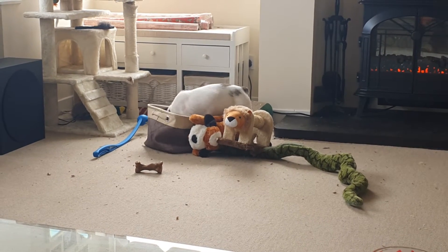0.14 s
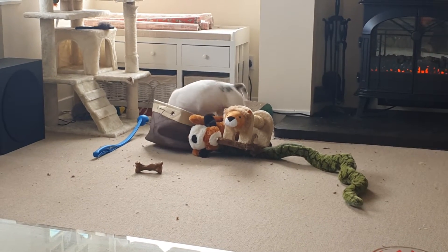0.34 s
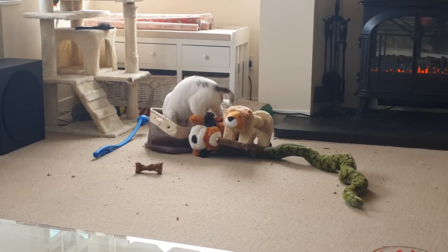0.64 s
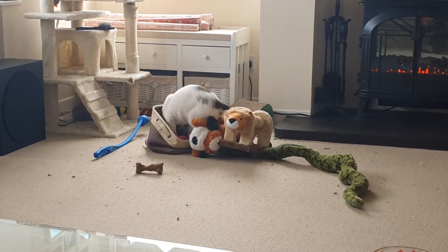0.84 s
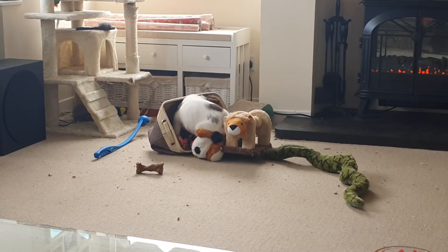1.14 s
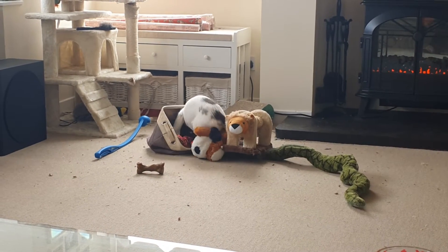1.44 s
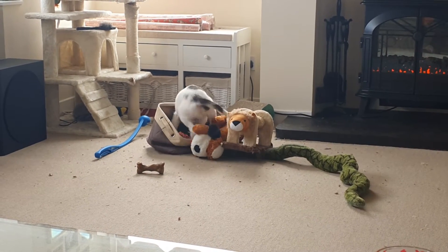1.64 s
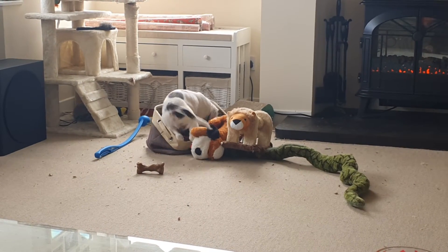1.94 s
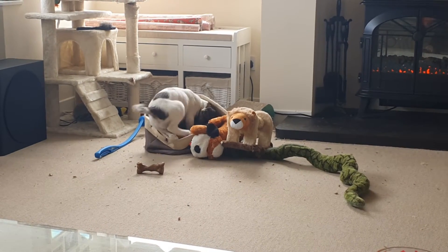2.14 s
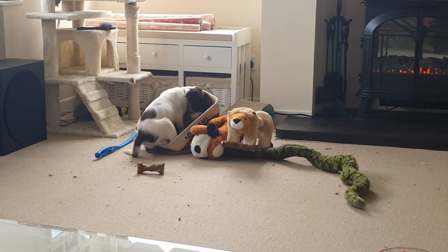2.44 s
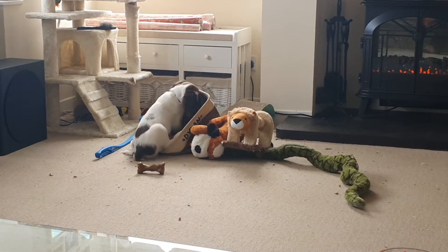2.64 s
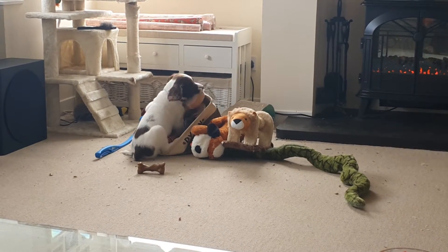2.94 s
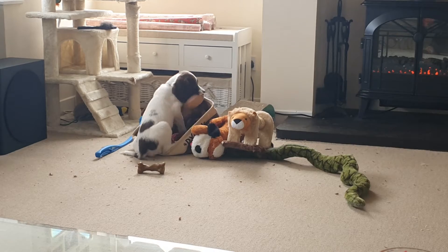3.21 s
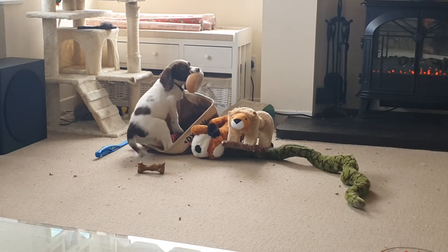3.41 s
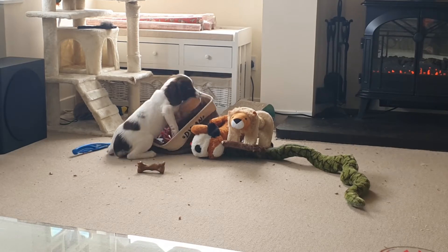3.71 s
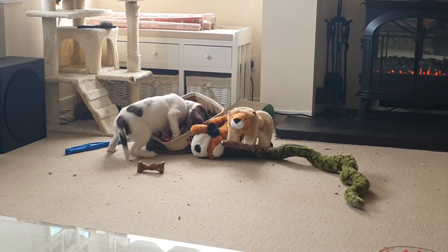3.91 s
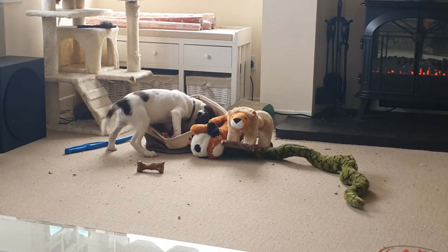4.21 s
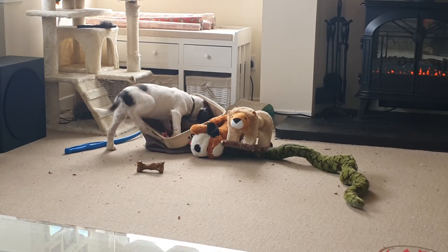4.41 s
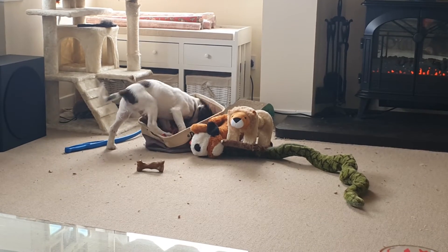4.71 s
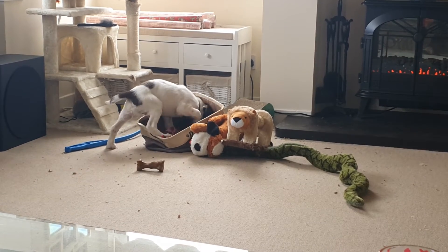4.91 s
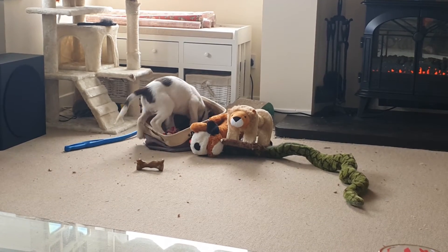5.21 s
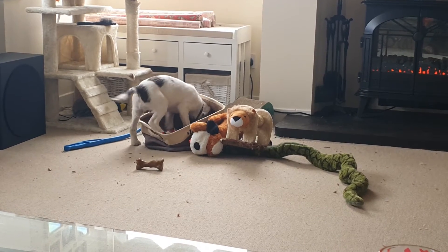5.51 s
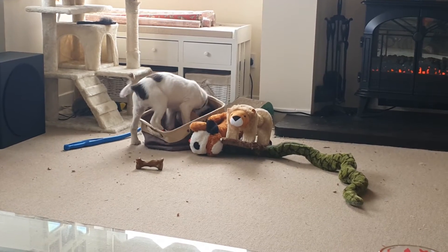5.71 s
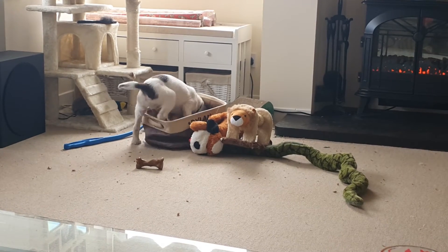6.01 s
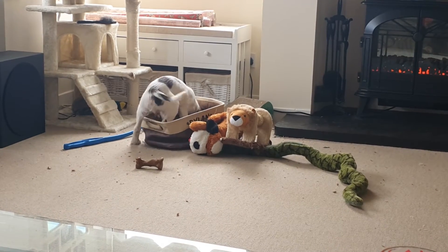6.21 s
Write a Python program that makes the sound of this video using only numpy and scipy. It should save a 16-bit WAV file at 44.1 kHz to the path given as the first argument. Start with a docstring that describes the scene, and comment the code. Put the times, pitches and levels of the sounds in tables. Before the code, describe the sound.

In a quiet carpeted living room, a puppy rummages in a fabric basket a few metres from the microphones. Cloth and fur rustle in uneven strokes while a squeaky toy gives very short, raspy chirps. Light knocks and soft thuds punctuate the digging. After a short lull near three seconds, the basket bumps hard and judders on the carpet, then gentler nosing continues over faint hum and hiss.

```python
"""A carpeted living room, where a puppy rummages in a fabric toy basket a few metres from the microphones.
It bites a squeaky toy: the reed buzzes in short bright squeaks, and air whistles thinly back in.
Shaped noise makes the rubbing of fur and cloth and the knocks of paws and toys.
The basket judders on the carpet as low, wavering tones, over a quiet room with a soft hum and hiss."""
import sys
import numpy as np
from scipy import signal
from scipy.fft import rfft, irfft, next_fast_len
from scipy.io import wavfile
from scipy.ndimage import map_coordinates

SR = 44100
rng = np.random.default_rng(int(sys.argv[2]) if len(sys.argv) > 2 else 0)


def wrap_up_sound(samples):
    """Save the sound to the file named by the first command line argument, as 16-bit audio."""
    columns = np.atleast_2d(samples).T
    # keep every value between -1 and 1, then stretch to whole-number steps
    tamed = np.clip(columns, -1, 1)
    steps = np.round(tamed * 32767).astype(np.int16)
    wavfile.write(sys.argv[1], SR, steps)


N = 280035  # length in samples

# In the colour tables of noises and of the reed, only the differences between levels matter.

# Squeezes of the toy: (t/s, length/s, pitch at start f/Hz, middle f/Hz, end f/Hz, level/dB,
# brightness/dB per octave, flutter 0-1, pressure rise over the squeeze/dB); pitch before sag and flutter
SQUEAKS = [(0.018, 0.032, 1825, 1800, 1310, -35.5, 0.5, 0.67, -3),
           (0.045, 0.049, 1613, 1340, 1200, -42, 5.5, 0.56, -11),
           (0.372, 0.03, 1875, 1737, 1313, -34.5, -4.5, 0.83, -0.5),
           (0.394, 0.038, 1540, 1320, 1194, -42, -4, 0.72, 5),
           (0.663, 0.055, 1389, 1407, 1371, -36, 1.5, 0.19, 3.5),
           (1.58, 0.037, 1370, 1912, 1970, -41.5, -1, 0.27, 3),
           (2.235, 0.031, 1268, 1370, 1446, -46, 2.5, 0.3, -4),
           (2.259, 0.022, 1635, 1577, 1405, -35.5, -3.5, 0.5, -1),
           (3.329, 0.022, 1356, 1314, 1200, -35, 7, 0.04, 4),
           (3.402, 0.015, 1503, 1483, 1320, -28, 5.5, 0.15, -2.5),
           (4.466, 0.041, 1354, 1486, 1438, -40.5, 3.5, 0.19, 14),
           (4.831, 0.032, 1480, 1692, 1423, -35, 3, 0.44, 4.5),
           (5.421, 0.043, 1315, 1409, 1340, -42.5, 4.5, 0.13, 1),
           (5.782, 0.033, 1370, 1327, 1160, -42, 7, 0.05, 0)]
# Tone colour of the toy's reed: (f/Hz, level/dB)
REED_COLOUR = [(1200, 13.5), (1650, -2.5), (2200, 8), (3000, -4.5), (3700, -3), (4400, -7.5), (5200, -10),
               (6000, -6.5), (7400, -19.5), (8900, -7.5), (10500, -14.5), (12000, -12), (13300, -21),
               (14500, -45)]
# Colour of the air hissing through the reed: (f/Hz, level/dB)
AIR_COLOUR = [(200, 3), (600, -6.5), (1000, -4), (1500, 1), (2300, -11), (3200, -2.5), (6200, -9.5),
              (7500, -13.5), (9000, -3), (12500, -9), (13600, -18), (15000, -40)]
# Thin whistles as the toy refills: (t/s, length/s, f/Hz, width f/Hz, level/dB)
WHISTLES = [(3.95, 0.047, 11930, 150, -74), (5.08, 0.097, 11800, 148, -80),
            (5.667, 0.028, 11970, 180, -65.5), (5.671, 0.073, 5470, 500, -68.5),
            (5.935, 0.045, 5700, 700, -69.5), (6.124, 0.062, 5450, 600, -70.5)]

# Colour of rubbed cloth: (f/Hz, level/dB)
FABRIC_COLOUR = [(300, 8), (700, -5), (1300, -7), (2000, -5), (3000, -14.5), (6000, -54)]
# Colour of rubbed fur, also used for scuffs: (f/Hz, level/dB)
FUR_COLOUR = [(1200, 6), (2400, 3), (3300, 4.5), (4500, 0), (6300, 2.5), (7500, -7.5), (9200, -3),
              (12500, -8.5), (14000, -14), (15700, -19)]
# The puppy digs, sits up for a moment, then noses about gently: (t/s, effort level/dB)
EFFORT = [(0, -4), (0.8, -0.5), (2.7, -0.5), (2.95, -12.5), (3.2, -4.5), (4.1, -9), (6.35, -8.5)]
# Pushes of a paw or shoulder along the basket: (t/s, length/s, fabric level/dB, fur over fabric level/dB)
STROKES = [(0.202, 0.067, -57, -7), (0.566, 0.22, -51.5, -8.5), (0.84, 0.1, -73.5, 9.5),
           (1.06, 0.18, -68, 8.5), (1.668, 0.12, -50.5, -14), (1.86, 0.17, -70.5, 5),
           (2.132, 0.43, -54.5, -11), (2.326, 0.13, -58, 4.5), (2.58, 0.17, -70.5, 4),
           (3.553, 0.088, -59.5, 9), (3.762, 0.1, -54, -9.5), (3.869, 0.11, -55.5, -19),
           (4.141, 0.11, -61, -3), (4.67, 0.12, -68, -8), (5.072, 0.11, -83, 4), (5.261, 0.18, -67, 2.5),
           (6.012, 0.063, -71, 3.5)]
BUSTLE_FABRIC_DB, BUSTLE_FUR_DB = -67, -68  # steady rustle where effort is 0 dB
FUR_GROWS = 1.14  # dB of fur per dB of effort
STROKE_PEAK, STROKE_FULLNESS = 0.43, 0.6  # share of a stroke spent speeding up; lower fullness = flatter top

# Paws and toys hit the basket:
# (t/s, floor thud level/dB, hollow bump level/dB, knock level/dB, scuff level/dB, time to fade 60 dB t/s)
KNOCKS = [(0.374, -63, -44, -32, -59, 0.032), (0.572, -55, -51, -39.5, -43, 0.025),
          (1.749, -39, -39.5, -52, -51.5, 0.31), (2.104, -58, -34, -45, -72, 0.041),
          (2.617, -56, -56, -38.5, -58, 0.057), (2.839, -61, -57, -56, -69, 0.019),
          (3.64, -46, -27, -34.5, -30, 0.062), (3.854, -32.5, -32.5, -63, -63, 0.082),
          (3.901, -45, -52, -49, -60, 0.031), (3.924, -32.5, -42.5, -48, -70, 0.067),
          (4.259, -48, -51, -42.5, -70, 0.035), (4.634, -53, -59, -47.5, -57, 0.05),
          (5.228, -45, -34, -62, -66, 0.11), (5.991, -58, -39, -28.5, -63, 0.042)]
# Colour of the floor's thud: (f/Hz, level/dB)
THUD_COLOUR = [(25, -15), (45, -17), (80, 0.5), (150, 1), (260, -9.5), (500, -28), (2000, -64)]
# Colour of the hollow basket's bump: (f/Hz, level/dB)
HOLLOW_COLOUR = [(80, -15), (180, -4.5), (250, 1.5), (400, -14.5), (520, -18), (1000, -31), (3000, -64)]
# Colour of a knocked toy: (f/Hz, level/dB)
KNOCK_COLOUR = [(150, -4.5), (390, 7.5), (500, 2), (650, 2.5), (900, -3.5), (1150, 8.5), (1500, -8),
                (2000, -20.5), (3000, -54), (8000, -51)]
# The basket slips and catches on the carpet:
# (t/s, length/s, slips a second at start f/Hz, middle f/Hz, end f/Hz, level/dB)
JUDDERS = [(3.567, 0.08, 155, 93, 97, -33), (3.63, 0.067, 86, 88, 89, -37.5),
           (3.775, 0.087, 170, 81, 29, -54), (3.864, 0.034, 126, 106, 95, -37),
           (3.909, 0.086, 102, 58, 90, -41.5)]

# Colour of the low room noise: (f/Hz, level/dB)
ROOM_TONE_COLOUR = [(15, -59), (25, -38), (91, -4), (144, -17), (182, 2), (319, -5.5), (474, -19),
                    (507, -10), (559, -14), (608, -11.5), (779, -16), (832, -18), (1300, -22.5),
                    (1690, -76), (2860, -120)]
# Colour of the faint hiss: (f/Hz, level/dB)
ROOM_HISS_COLOUR = [(700, -20), (1200, 2.5), (2000, 6), (3000, -11.5), (6000, -6.5), (7500, -13.5),
                    (9500, -7), (15500, -22.5)]
# Bands of the hum: (f/Hz, width f/Hz, level/dB)
HUM = [(88.8, 17.6, -67.5), (206, 97, -68.5), (313.7, 12, -67.5), (571.7, 9.9, -71.5), (770.3, 26, -71.5)]

# How alike left and right are: (f/Hz, likeness from -1 to 1)
ALIKE = [(60, 0.76), (150, 0.99), (280, 0.97), (500, 0.71), (1000, 0.24), (3000, -0.21), (12000, -0.14)]
# How long the room's echo takes to fade 60 dB: (f/Hz, t/s)
ECHO = [(150, 0.22), (1000, 0.28), (3000, 0.28), (7000, 0.26), (14000, 0.25)]
# Difference between the two microphones: (f/Hz, left minus right level/dB)
BALANCE = [(700, 0), (1400, .3), (2800, 3), (4400, 3), (6000, 5.5), (7300, -2), (9000, -3), (11500, 2),
           (15000, 1)]
TOP_HZ = 15750  # nothing is heard above this


def squeaks():
    """The reed buzzes in harmonics; squeaks with more flutter are rougher and hiss more."""
    out = np.zeros((2, N))
    k = np.arange(1, 13)[:, None]  # harmonic numbers
    for s, length, start_hz, middle_hz, end_hz, db, bright_db, flutter, rise_db in SQUEAKS:
        swell, pitch = gesture(length, start_hz, middle_hz, end_hz, fullness=0.4)
        n = len(pitch)
        progress = np.minimum(np.arange(n) / SR / length, 1)
        pressure = swell * amp(rise_db * (progress - .5))

        # A weakly blown reed sags in pitch and loses its overtones
        slack = 1 - swell
        shake = flutter * (0.098 * wobble(1122, n) + 0.0518 * wobble(199.6, n))
        pitch = pitch * np.exp(shake - 0.073 * slack)
        phase = 2 * np.pi * np.cumsum(pitch) / SR

        tilt_db = (bright_db - 3.2 * slack) * np.log2(k)
        sizes = amp(along(REED_COLOUR, k * pitch) + tilt_db) * (k * pitch < TOP_HZ)
        sizes = sizes / np.sqrt(np.sum(sizes ** 2, axis=0) / 2)  # same total power at every moment
        waves = np.sin(k * phase + rng.uniform(0, 2 * np.pi, k.shape))
        reed = np.sum(sizes * waves, axis=0)

        rasp = unit(amp(6 * flutter * wobble(450, n)))  # rough changes in loudness
        air = (.12 + .7 * flutter) * swell * noise(AIR_COLOUR, n)
        add(out, s, room(amp(db) * pressure * rasp * (reed + air), wet_db=5.0))
    return out


def whistles():
    """Air seeps back into the toy, heard as noise in a narrow band."""
    out = np.zeros(N)
    for s, length, hz, width_hz, db in WHISTLES:
        suction = gesture(length, hz, hz, hz, fullness=0.25)[0]
        add(out, s, amp(db) * suction * narrow(hz, width_hz, len(suction)))
    return room(out, wet_db=2)[:, :N]


def rubbing():
    """Fibres catch and let go, so the noise flickers; strokes speed up and slow over a steady rustle."""
    t = np.arange(N) / SR
    effort_db = np.interp(t, *np.transpose(EFFORT))
    fabric_power = amp(BUSTLE_FABRIC_DB + effort_db) ** 2
    fur_power = amp(BUSTLE_FUR_DB + FUR_GROWS * effort_db) ** 2
    for s, length, db, fur_db in STROKES:
        ramp = np.interp((t - s) / length, [0, STROKE_PEAK, 1], [0, 1, 0])
        speed = np.sin(np.pi / 2 * ramp) ** STROKE_FULLNESS
        fabric_power = fabric_power + (amp(db) * speed) ** 2
        fur_power = fur_power + (amp(db + fur_db) * speed) ** 2

    catching_db = 1.95 * wobble(35, N) + 3 * wobble(600, N)
    fabric = np.sqrt(fabric_power) * unit(amp(catching_db) * noise(FABRIC_COLOUR, N))
    fur = np.sqrt(fur_power) * unit(amp(catching_db) * noise(FUR_COLOUR, N))
    return room(fabric + fur, wet_db=5.5)[:, :N]


def knocks():
    """Each blow thuds in the floor, bumps the hollow basket, knocks a toy and scuffs the cloth."""
    out = np.zeros((2, N))
    t = np.arange(SR // 3) / SR
    for s, thud_db, hollow_db, knock_db, scuff_db, t60 in KNOCKS:
        thud = amp(thud_db) * noise(THUD_COLOUR, len(t))
        bump = amp(hollow_db) * noise(HOLLOW_COLOUR, len(t))
        knock = amp(knock_db) * noise(KNOCK_COLOUR, len(t))
        scuff = amp(scuff_db) * noise(FUR_COLOUR, len(t))
        onset = 1 - np.exp(-t / (0.034 * t60))  # brief blows also start sharply
        fade = amp(-60 * t / t60)
        add(out, s, room(onset * fade * (thud + bump + knock + scuff), wet_db=4))
    return out


def judders():
    """The dragged basket sticks and slips, and the floor drums at that rate."""
    out = np.zeros(N)
    for s, length, start_hz, middle_hz, end_hz, db in JUDDERS:
        weight, rate = gesture(length, start_hz, middle_hz, end_hz, fullness=0.25)
        uneven_rate = rate * np.exp(0.12 * wobble(174, len(rate)))
        phase = 2 * np.pi * np.cumsum(uneven_rate) / SR
        tone = unit(np.sin(phase) + 0.2 * np.sin(2 * phase))
        drum = tone + 0.51 * noise(THUD_COLOUR, len(rate))
        add(out, s, amp(db) * weight * drum)
    return room(out, wet_db=-6.5)[:, :N]


def background():
    """Low room noise and faint hiss spread wide, with a hum of narrow noise bands in the centre."""
    hum = sum(amp(db) * narrow(hz, width_hz, N) for hz, width_hz, db in HUM)
    tone = amp(-54.5) * spread(noise(ROOM_TONE_COLOUR, (2, N)))
    hiss = amp(-73) * spread(noise(ROOM_HISS_COLOUR, (2, N)))
    return tone + hiss + hum


def room(x, wet_db):
    """The direct sound, plus a stereo echo that fades at its own speed in each pitch range."""
    hz, t, grains = signal.stft(rng.standard_normal((2, SR // 2)), SR, nperseg=256)
    build_up = 1 - np.exp(-t / 0.0011)
    fade = amp(-60 * t / along(ECHO, hz)[:, None])
    tail = spread(signal.istft(grains * build_up * fade, SR, nperseg=256)[1])
    response = amp(wet_db) * tail / np.linalg.norm(tail[0])
    response[:, 0] += 1  # the direct sound
    # Dividing keeps the overall level about the same for any amount of echo
    return signal.fftconvolve(x[None], response, axes=1) / np.hypot(1, amp(wet_db))


def gesture(length, start, middle, end, fullness):
    """A push swells and falls while the pitch (or rate) arcs through three values."""
    u = np.minimum(np.arange(SR // 8) / SR / length, 1)  # progress from 0 to 1
    pitch = np.polyval(np.polyfit([0, .5, 1], [start, middle, end], 2), u)
    swell = (4 * u * (1 - u)) ** fullness * (u < 1)
    return swell, pitch


def spread(pair):
    """Two unrelated signals become left and right, most alike in the bass."""
    def mix(hz):
        angle = np.arccos(np.clip(along(ALIKE, hz), -1, 1)) / 2
        return np.array([np.cos(angle), np.sin(angle)])
    mid, side = filtered(pair, mix)
    return np.array([mid + side, mid - side])


def noise(colour, shape):
    """Coloured noise of average strength (rms) 1."""
    return unit(filtered(rng.standard_normal(shape), lambda hz: amp(along(colour, hz))))


def narrow(centre_hz, width_hz, n):
    """Noise in one resonance, rms 1; the width is where the strength has halved."""
    return unit(filtered(rng.standard_normal(n), lambda hz: 1 / (1 + (2 * (hz - centre_hz) / width_hz) ** 2)))


def wobble(rate, n):
    """A smooth random curve through `rate` random points a second."""
    points = rng.standard_normal(n // 8 + 4)
    return map_coordinates(points, [np.arange(n) * rate / SR], order=2, mode="wrap")


def filtered(x, response):
    """Make each frequency of x stronger or weaker, as response(hz) says."""
    n = x.shape[-1]
    m = next_fast_len(n + 4096)  # spare room for the filter's ringing
    return irfft(rfft(x, m) * response(np.fft.rfftfreq(m, 1 / SR)), m)[..., :n]


def along(points, hz):
    """Read a value between (f/Hz, value) points, on a log frequency axis."""
    f, v = np.transpose(points)
    return np.interp(np.log(hz + 1), np.log(f + 1), v)


def amp(db):
    """Turn decibels into a plain multiplier."""
    return 10 ** (np.asarray(db) / 20)


def unit(x):
    """Scale to rms 1."""
    return x / np.sqrt(np.mean(x ** 2) + 1e-20)


def add(track, s, sound):
    """Mix a sound into the track at s seconds."""
    part = track[..., max(0, round(s * SR)):][..., :sound.shape[-1]]
    part += sound[..., :part.shape[-1]]


def scene():
    """Everything around the basket, over the room's own noise."""
    return squeaks() + whistles() + rubbing() + knocks() + judders() + background()


def record(dry):
    """The two microphones colour the treble differently; nothing passes the band limit."""
    half = np.array([[.5], [-.5]])  # left gets half the difference, right the opposite half
    coloured = filtered(dry, lambda hz: amp(half * along(BALANCE, hz)))
    return filtered(coloured, lambda hz: hz < TOP_HZ)


dry = scene()
out = record(dry)
wrap_up_sound(out)
```